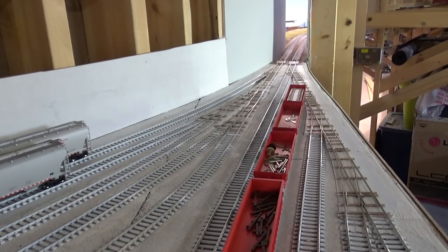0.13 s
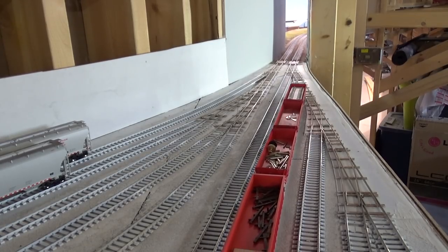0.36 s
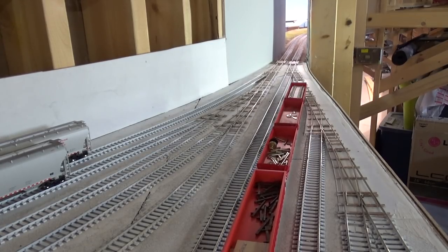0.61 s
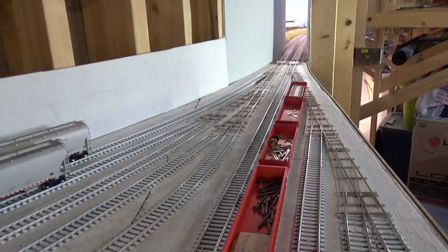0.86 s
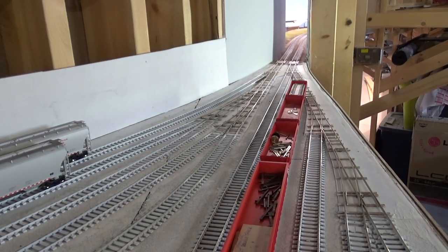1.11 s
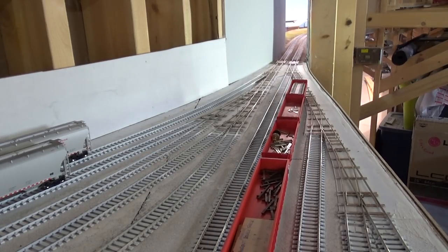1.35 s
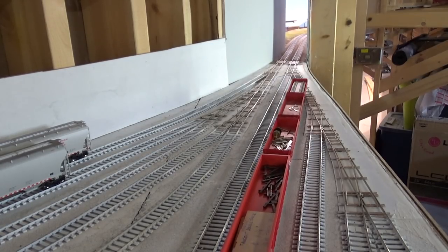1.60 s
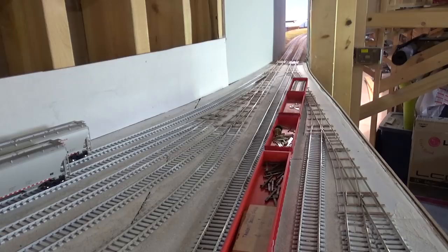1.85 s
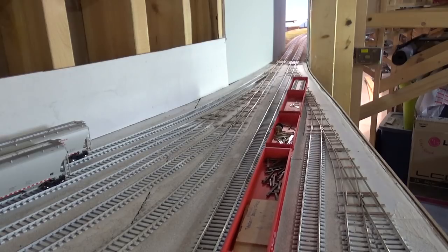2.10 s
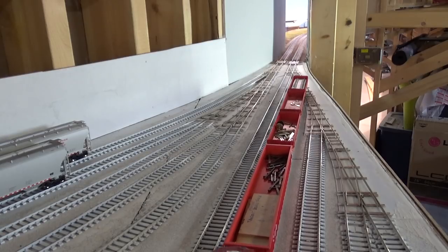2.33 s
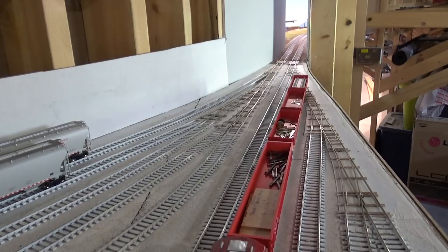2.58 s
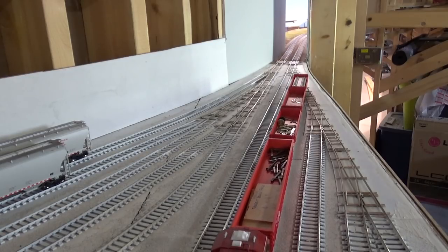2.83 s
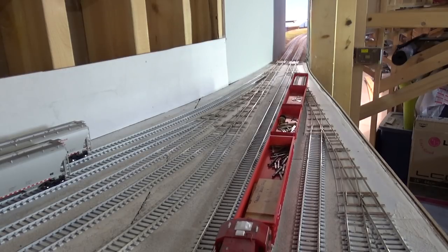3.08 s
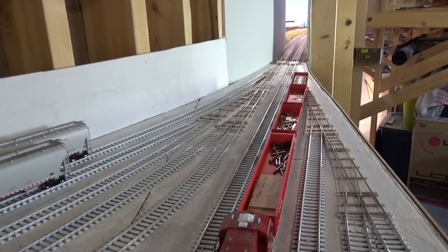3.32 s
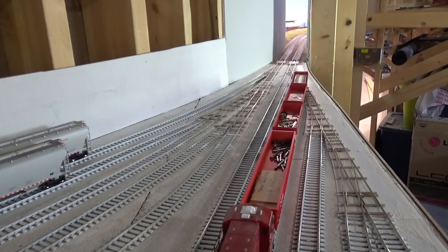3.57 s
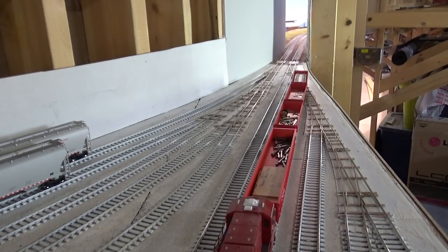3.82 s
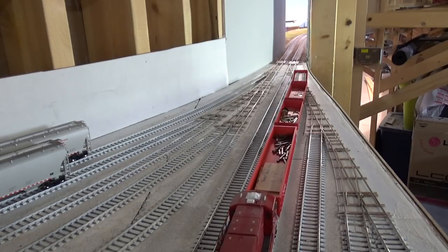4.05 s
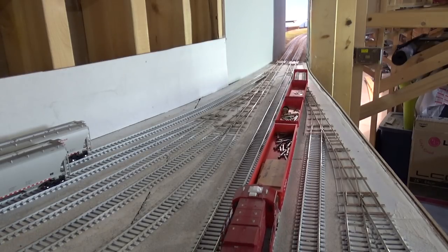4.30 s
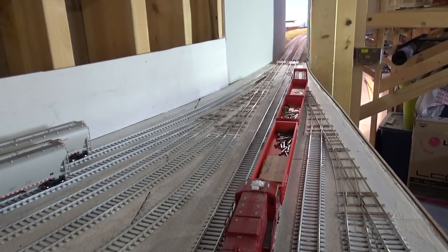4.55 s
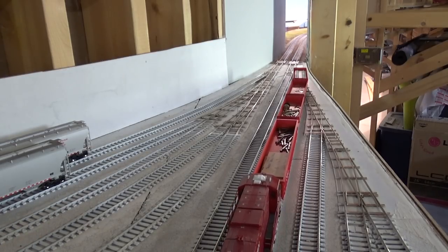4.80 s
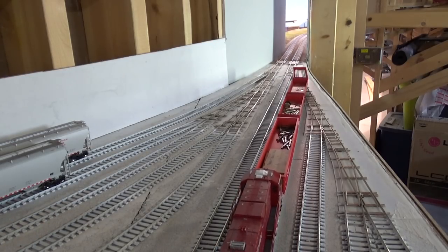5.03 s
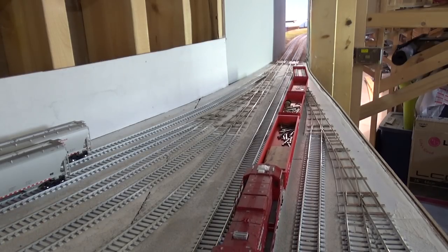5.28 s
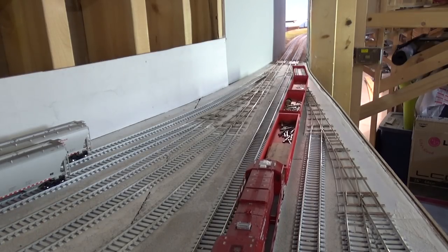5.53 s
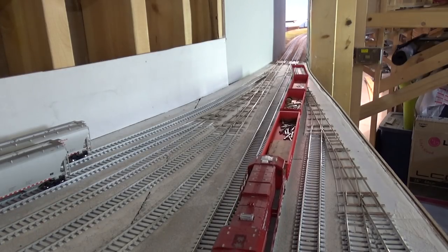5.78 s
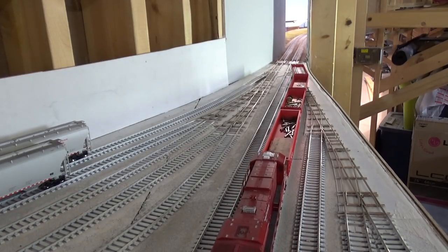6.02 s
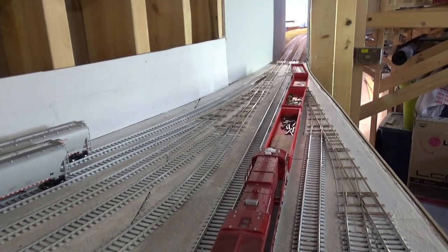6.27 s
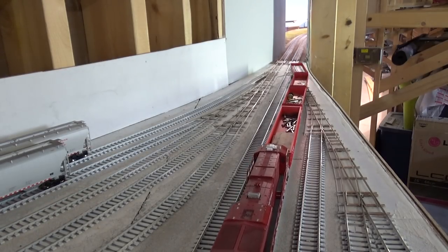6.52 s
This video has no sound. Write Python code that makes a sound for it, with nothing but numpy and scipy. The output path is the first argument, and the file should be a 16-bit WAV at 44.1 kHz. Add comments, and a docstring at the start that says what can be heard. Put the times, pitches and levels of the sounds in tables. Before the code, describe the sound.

Close, steady hollow whir of a miniature train on a baseboard, with rapid metallic gear rattle, soft rhythmic wheel knocks and scattered bright rail clicks.

```python
"""An unfinished room with a wooden layout: a small electric model train creeps away from a close stereo microphone.
Wheels drone in the baseboard as shaped noise and axle-order tones; gear impacts chatter six times an axle turn.
A worn wheel thuds as a decaying ring once a turn, and short noise bursts tick where wheels cross rail joints.
Reflections off board and walls draw peaks and dips that climb as the engine recedes, over room rumble and hum;
gain control ducks the loud moments."""
import sys
import numpy as np
from scipy import signal
from scipy.fft import rfft, irfft, next_fast_len
from scipy.io import wavfile
from scipy.ndimage import uniform_filter1d, minimum_filter1d, map_coordinates

SR = 44100
rng = np.random.default_rng(int(sys.argv[2]) if len(sys.argv) > 2 else 0)


def to_linear_factor(level_db):
    """Convert decibel levels (scalar or array-like) to linear amplitude factors."""
    exponent = np.asarray(level_db, float) / 20
    return 10 ** exponent


def dump(signal):
    """Clip the signal to [-1, 1] and save it as 16-bit WAV at the path in sys.argv[1]."""
    limited = np.clip(np.atleast_2d(signal).T, -1, 1)
    pcm = np.round(limited * 32767).astype(np.int16)
    wavfile.write(sys.argv[1], SR, pcm)


N = 292817  # samples

# Course of the pass, before reflections and mix:
# [t/s, rolling level/dB, chatter level/dB, left-right level/dB, treble level/dB]
PASS_LEVELS = [(0, -17, -22.5, 1.8, 0), (1.5, -18.5, -23, 0.7, 2), (2.3, -17.5, -24.5, 1, 6.5),
               (3, -17.5, -23.5, 0.8, 1.5), (3.8, -18, -22.3, .9, -3), (4.6, -17.5, -23.5, 0.1, -2),
               (5.5, -18, -22, -0.3, -4.5), (6.64, -18, -23.5, -0.7, -7)]
# Room rumble spectrum, shape only: [f/Hz, level/dB per Hz]
RUMBLE_SPECTRUM = [(12, -44), (20, -16), (54, -20), (81, -11.5), (113, 1), (182, -10.5), (260, 3),
                   (340, -45), (570, -120)]
RUMBLE_DB = -55  # rms over both ports, before gain control
# Mains hum, before its wobble and gain control: [f/Hz, peak level/dB]
MAINS_HUM = [(59.2, -64), (118.4, -74)]

AXLE_HZ = 4.5974  # axle turns a second
# Drone of baseboard and car bodies, shape only: [f/Hz, level/dB per Hz]
DRONE_SPECTRUM = [(110, -62), (190, -46), (290, -29.5), (420, -29.5), (570, -21), (630, -22), (720, -17),
                  (890, -11.5), (930, -8.5), (1270, 1), (1440, -7.5), (1640, -5.5), (1820, -18.5),
                  (2400, -35.5), (5300, -120)]
# Narrow board modes: [f/Hz, width/Hz, level over the drone/dB]
BOARD_MODES = [(985, 20, 3.5), (1130, 9.2, 6.5), (1308, 43, 4.5), (1589, 27, 4.5)]
# Part of the drone that returns every turn: [f/Hz, share of power]
RETURNING_SHARE = [(200, 0.56), (600, 0.91), (850, 0.79), (1200, 0.14), (1600, 0.073), (2200, .01)]
# Strongest drive-train tones, before wobble and mix: [multiple of the axle turn, rms level/dB]
DRIVE_ORDERS = [(64, -65), (99, -53), (108, -53), (124, -53), (126, -47), (129, -50), (132, -44.5),
                (141, -49), (172, -47), (215, -38), (248, -36), (256, -34)]
SHAFT_GEAR = 3  # gear-shaft turns in one axle turn
# Gear-shaft overtones, before random spread and mix: [f/Hz, rms level of each/dB]
SHAFT_OVERTONES = [(280, -71), (400, -66), (500, -58), (600, -58), (700, -54), (800, -51)]

# Ring of the engine shell, shape only: [f/Hz, level/dB per Hz]
SHELL_SPECTRUM = [(1200, -34), (1900, -12), (2300, -13), (2650, -7), (3050, -10.5), (3780, 3.5),
                  (4400, -10.5), (5200, -12.5), (6000, -24.5), (7000, -33.5), (7500, -43), (8700, -41),
                  (10000, -25.5), (10800, -32), (11500, -30), (12800, -38), (13600, -42), (14300, -46)]
# Places where the gears bind, before scaling: [place/turn, width/turn, swell/dB]
GEAR_BINDING = [(.02, 0.015, 3), (.17, 0.042, 4), (.33, 0.018, 2), (.49, 0.032, 4.5), (.68, 0.043, 2.5),
                (0.831, 0.034, 7)]

# Worn wheel: place in the turn, strength before the mix (dB), decay by 60 dB (s)
FLAT_TURN, FLAT_DB, FLAT_T60_S = .85, -27, .11
# Tones of the thud: [f/Hz, relative level/dB]
THUD_TONES = [(460, -5), (595, 0)]

# Loud rail-joint ticks: [t/s, relative strength/dB, extra strength of the body/dB]
RAIL_JOINTS = [(0.2433, -17, -2), (0.3132, -13, 10), (0.3865, -15, 0), (0.4648, -19, 2), (0.8205, -11, 10),
               (0.9333, -19, 9), (2.0976, -12, 5.5), (5.1756, -18, 5), (5.5343, -15, 3), (5.6067, -7, -3),
               (5.685, -18, 3), (5.9688, -18, 0), (6.0434, -11, 7), (6.1863, -15, 5)]
# Stretches of track with many small gaps: [start t/s, end t/s]
GAPPY_TRACK = [(.25, 1.7), (4.7, 6.55)]
SMALL_DB, SMALL_SPREAD_DB, SMALL_BODY_DB = -24, 3, 4  # the faint ticks there, on the scale of RAIL_JOINTS

# Reflected paths, before the low-frequency blur:
# [extra delay at 0 s/ms, decay rate of the delay/(1/s), strength at 4 kHz (negative = inverted), tilt/dB per octave]
REFLECTED_PATHS = [(.288, .114, -.192, -2.8), (.439, .049, -.284, -12.5), (.552, .045, .085, -2.5),
                   (.577, .009, -.404, -2.4), (.682, .014, -.263, -6.7), (.781, .159, -.118, -8.7),
                   (.784, .068, -.05, 4.4), (.93, .037, -.168, -9.2), (.985, .162, .096, -3.1),
                   (1.354, .039, .06, -1.6), (1.968, .079, -.075, -8.2), (2.736, .072, .033, -14.9),
                   (2.785, .045, -.037, -13.3), (2.876, .067, .067, -12.5), (2.914, .098, -.06, -9.8)]
DIFFUSE_HZ = 1450  # below it the whole board sounds and the paths blur
CLIMB = 0.0546  # share of pitch the fine comb gains a second as path differences shrink
TREBLE_HZ, BASS_HZ, BASS_FADE_DB = 8200, 800, 0.65  # band edges; dB a second the low drone loses in receding
# Bands that start loud and soon fall back, before levels are centred: [f/Hz, half width/Hz, level/dB]
OPENING_BANDS = [(2480, 290, 12), (5700, 800, 2.5)]
OPENING_S = 0.63
# Own lean of the upper bands: [f/Hz, left-right level at 0 s/dB, change/dB a second]
BAND_LEAN = [(1500, 0, 0), (2200, -3.1, 0.62), (4400, -0.8, 0), (5500, 1, -0.33)]
# Phase between the microphone ports: [f/Hz, lead of the left port/rad]
PORT_LEAD = [(100, 0.22), (480, 0.53), (1400, 0.14), (2200, -0.53), (3500, -0.063), (6000, 0.32)]
# Decay of the room's answer: [f/Hz, t60/s]
ROOM_DECAY = [(200, 0.15), (2000, 0.087), (10000, 0.036)]
# Stereo width, level of the left-right difference, narrower in the treble: [f/Hz, level/dB]
STEREO_WIDTH = [(20, -12), (60, 0), (4800, 0), (6000, -5), (14000, -8)]


def unit(x):
    """Scales to an rms of one."""
    return x / np.sqrt(np.mean(x ** 2) + 1e-20)


def along(points, hz):
    """Reads (f/Hz, value) points on a log axis."""
    f, value = np.transpose(points)
    return np.interp(np.log(hz + 1), np.log(f + 1), value)


def curve(column):
    """One column of the pass levels, a value per sample."""
    columns = np.transpose(PASS_LEVELS)
    return np.interp(np.arange(N) / SR, columns[0], columns[column])


def wobble(rate):
    """A smooth random curve, rate knots a second."""
    knots = rng.standard_normal(int(N * rate / SR) + 4)
    return map_coordinates(knots, [np.arange(N) * rate / SR])


def filtered(x, response):
    """x through a given response of frequency."""
    m = next_fast_len(N + SR // 2)
    return irfft(rfft(x, m) * response(np.fft.rfftfreq(m, 1 / SR)), m)[..., :N]


def looped(one_turn, turn):
    """Reads the profile of one axle turn again and again."""
    return map_coordinates(one_turn, [turn % 1 * len(one_turn)], mode="grid-wrap")


def background():
    """Low room rumble, partly shared by the ports, and an unsteady mains hum."""
    shared, apart = filtered(rng.standard_normal((2, N)), lambda f: to_linear_factor(along(RUMBLE_SPECTRUM, f)))
    apart = filtered(apart, lambda f: f / (f + 60))
    rumble = unit(np.array([shared + 0.33 * apart, shared - 1.04 * apart]))
    t = np.arange(N) / SR
    hum = sum(to_linear_factor(db + 2.8 * wobble(4)) * np.sin(2 * np.pi * hz * t + 0.63 * wobble(2.86))
              for hz, db in MAINS_HUM)
    return to_linear_factor(RUMBLE_DB) * rumble + hum


def rolling():
    """Wheel and gear flaws return every turn, rail roughness does not; both drive the board and its modes."""
    turn = np.arange(N) * AXLE_HZ / SR + 0.00041 * wobble(3.94)  # the speed wanders a little

    def share(f):
        return np.clip(along(RETURNING_SHARE, f), 0, 1)

    def board(f):
        modes_db = sum(db / (1 + (2 * (f - hz) / width) ** 2) for hz, width, db in BOARD_MODES)
        return to_linear_factor(along(DRONE_SPECTRUM, f) + modes_db)

    orders = rfft(rng.standard_normal(round(SR / AXLE_HZ)))
    one_turn = unit(irfft(orders / np.sqrt(np.abs(orders))))  # many small flaws: no order stands far out
    flaws = filtered(looped(one_turn, turn), lambda f: np.sqrt(share(f)))
    roughness = filtered(rng.standard_normal(N), lambda f: np.sqrt(1 - share(f)))
    drone = unit(filtered(flaws + roughness, board))

    angle = 2 * np.pi * np.arange(4096) / 4096
    shaft = [(k, along(SHAFT_OVERTONES, k * AXLE_HZ) + 2.0 * rng.normal())
             for k in SHAFT_GEAR * np.arange(20, 59)]
    tones = sum(to_linear_factor(db) * np.sqrt(2) * np.sin(k * angle + rng.uniform(0, 2 * np.pi))
                for k, db in [*DRIVE_ORDERS, *shaft])
    drone = drone * to_linear_factor(curve(column=1) + 0.78 * wobble(12))
    return drone + to_linear_factor(2.0 * wobble(6)) * looped(tones, turn)


def gears():
    """Dense tooth impacts ring the shell; they swell wherever the gears bind, a little differently each turn."""
    turn = np.arange(N) * AXLE_HZ / SR
    bind = sum(db * np.exp(-(((turn - at + .5) % 1 - .5) / width) ** 2 / 2)
               for at, width, db in GEAR_BINDING)
    swell_db = 0.9 * bind * (1 + 0.13 * wobble(14)) + 0.5 * wobble(9) + 0.6 * wobble(45)
    hardness_db = 2 * np.minimum(rng.exponential(size=N), 5)  # mostly small, a few hard
    impacts = rng.standard_normal(N) * to_linear_factor(hardness_db)
    rattle = filtered(impacts * to_linear_factor(swell_db), lambda f: to_linear_factor(along(SHELL_SPECTRUM, f)))
    return unit(rattle) * to_linear_factor(curve(column=2))


def thuds():
    """A worn wheel knocks softly and low at the same place of every axle turn, as two decaying tones."""
    out, t = np.zeros(N + SR), np.arange(SR // 5) / SR
    ring = sum(to_linear_factor(db) * np.sin(2 * np.pi * hz * t) for hz, db in THUD_TONES)
    ring = ring * to_linear_factor(-60 * t / FLAT_T60_S) * (1 - np.exp(-t / .01))
    for turn in range(int(N / SR * AXLE_HZ)):
        start = round((turn + FLAT_TURN) / AXLE_HZ * SR)
        out[start:][:len(t)] += to_linear_factor(FLAT_DB + 1.5 * rng.normal()) * ring
    return out[:N]


def joints():
    """Each tick is a short burst, heard as a bright edge and a ring of the shell; faint ones fall at random."""
    edge, body, t = np.zeros(N + SR), np.zeros(N + SR), np.arange(SR // 20) / SR
    small = [(rng.uniform(*span), SMALL_DB + SMALL_SPREAD_DB * rng.normal(), SMALL_BODY_DB)
             for span in GAPPY_TRACK for _ in range(8)]
    for s, db, body_db in [*RAIL_JOINTS, *small]:
        burst = rng.standard_normal(len(t)) * to_linear_factor(-60 * t / 0.031) * (1 - np.exp(-t / 0.00054))
        start = round(s * SR)
        edge[start:][:len(t)] += to_linear_factor(db - 18) * burst
        body[start:][:len(t)] += to_linear_factor(db + body_db - 14) * burst

    def shell(f):
        return to_linear_factor(along(SHELL_SPECTRUM, f))

    def bright_shell(f):
        return shell(f) * to_linear_factor(30) / (1 + (5000 / (f + 1)) ** 8)

    return filtered(body[:N], shell) + filtered(edge[:N], bright_shell)


def ripple(hz, t, step_hz, life):
    """Many longer paths: a fine random comb that climbs with the bands and slowly renews itself (life in s)."""
    knots = rng.standard_normal((int(SR / 2 / step_hz) + 4, int(N / SR / life) + 4))
    return map_coordinates(knots, np.broadcast_arrays(hz * np.exp(-CLIMB * t) / step_hz, t / life))


def reflections(x):
    """Direct and reflected paths add or cancel in bands that climb as delays shrink, unequally at the two ports."""
    hz, t, z = signal.stft(x, SR, nperseg=1024, noverlap=768)
    hz = hz[:, None] + 1
    echoes = 0
    for ms, lost, strength, tilt_db in REFLECTED_PATHS:
        delay_s = ms / 1000 * np.exp(-lost * t)
        colour = strength * to_linear_factor(tilt_db * np.log2(hz / 4000))
        echoes = echoes + colour * np.exp(-2j * np.pi * hz * delay_s)
    echoes = echoes / (1 + (DIFFUSE_HZ / hz) ** 4)
    level = 10 * np.log10(np.abs(1 + echoes) ** 2 + 0.011)

    treble_db = curve(column=4)[np.minimum(t * SR, N - 1).astype(int)]
    level = level + treble_db / (1 + (TREBLE_HZ / hz) ** 6)
    level = level - BASS_FADE_DB * t / (1 + (hz / BASS_HZ) ** 4)
    level = level + sum(db * np.exp(-((hz - centre_hz) / width) ** 2 / 2 - (t / OPENING_S) ** 2)
                        for centre_hz, width, db in OPENING_BANDS)
    level = level - level.mean(axis=1, keepdims=True)  # the source spectra are averages over the whole pass
    short = 1 / (1 + (1900 / hz) ** 4)  # longer paths show in short waves only
    level = level + 2.2 * short * ripple(hz, t, step_hz=90, life=.8)

    at, start_db, change_db = np.transpose(BAND_LEAN)
    pan_db = np.interp(hz, at, start_db) + np.interp(hz, at, change_db) * t
    pan_db = pan_db + 1.8 * short * ripple(hz, t, step_hz=192, life=0.825)
    half = to_linear_factor(pan_db / 2) * np.exp(.5j * along(PORT_LEAD, hz))  # left gets half the difference, right its inverse
    ports = z * to_linear_factor(level) * np.array([half, 1 / half])
    return signal.istft(ports, SR, nperseg=1024, noverlap=768)[1][:, :N]


def room(x):
    """Each frequency of the room's answer dies at its own speed, differently at each port."""
    hz, t, z = signal.stft(rng.standard_normal((2, SR // 2)), SR, nperseg=256)
    tail = signal.istft(z * to_linear_factor(-60 * t / along(ROOM_DECAY, hz)[:, None]), SR, nperseg=256)[1]
    late = np.pad(x, ((0, 0), (200, 0)))  # the answer starts 200 samples late
    return signal.fftconvolve(late, tail / np.linalg.norm(tail[0]), axes=1)[:, :N]


def scene():
    """The receding train, its answer from the room, and the background."""
    train = reflections(rolling() + thuds() + gears() + joints())
    train = train * to_linear_factor(curve(column=3) * [[.5], [-.5]])  # the engine drifts from the left past the middle
    return to_linear_factor(2.0) * train + to_linear_factor(-14.5) * room(train) + background()


def band_limit(x):
    """A steep low-pass at the top of the band."""
    return signal.sosfilt(signal.butter(12, 14240, fs=SR, output="sos"), x)


def record(dry):
    """The stereo image narrows in the treble; a fast gain control ducks both channels under loud moments."""
    mid = dry.mean(axis=0)
    side = filtered((dry[0] - dry[1]) / 2, lambda f: to_linear_factor(along(STEREO_WIDTH, f)))
    power = uniform_filter1d(uniform_filter1d(mid ** 2, size=250), size=250)
    loudness = np.sqrt(np.abs(power) + 1e-9)
    gain = np.minimum(1, to_linear_factor(-17) / loudness) ** .27
    need = np.minimum(1, to_linear_factor(-4) / (np.abs(gain * mid) + 1e-9))  # a look-ahead stage catches the peaks left
    gain = gain * uniform_filter1d(minimum_filter1d(need, size=120), size=120)
    mix = gain * np.array([mid + side, mid - side])
    return band_limit(mix)


dry = scene()
out = record(dry)
dump(out)
```